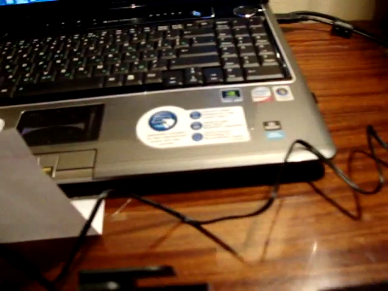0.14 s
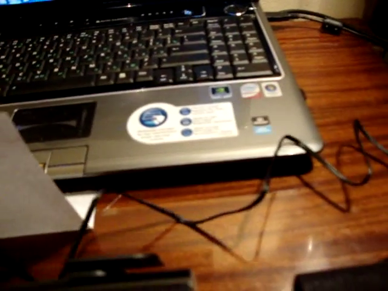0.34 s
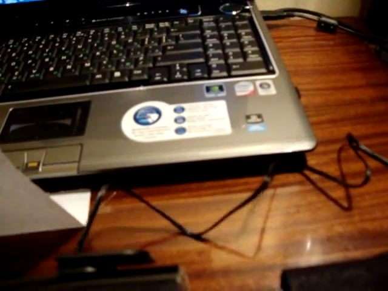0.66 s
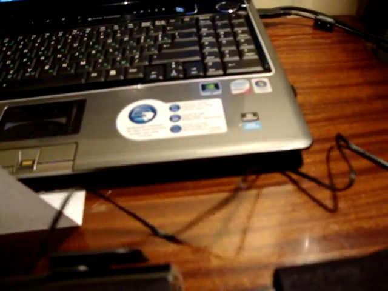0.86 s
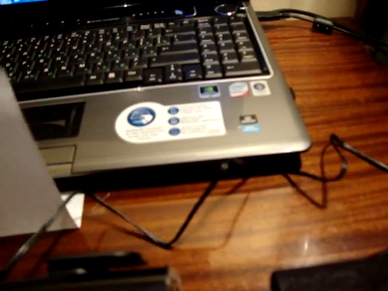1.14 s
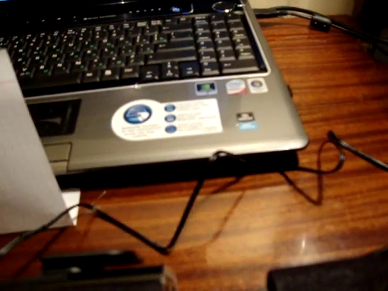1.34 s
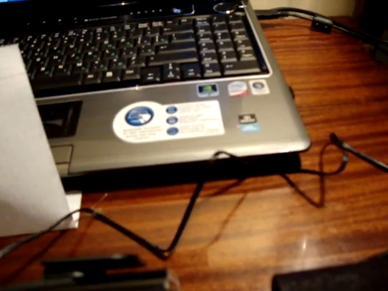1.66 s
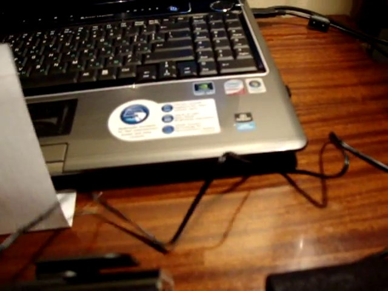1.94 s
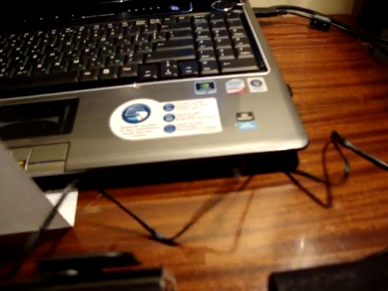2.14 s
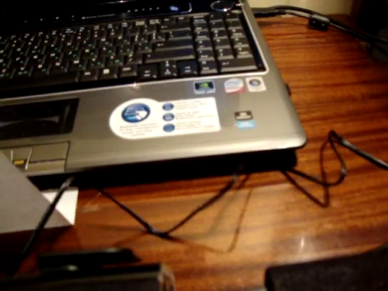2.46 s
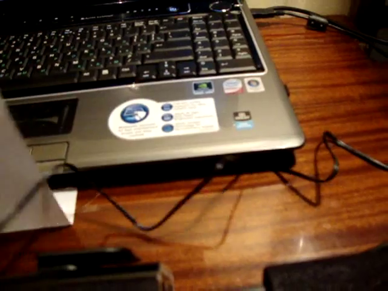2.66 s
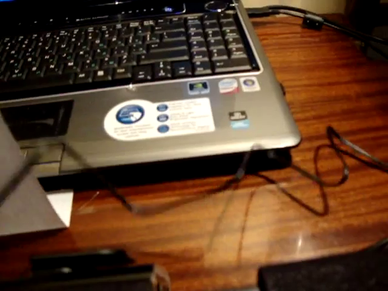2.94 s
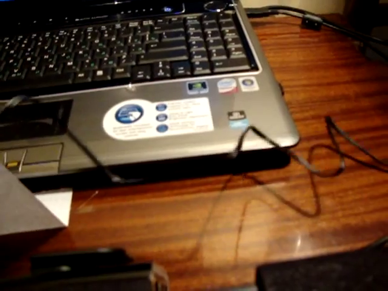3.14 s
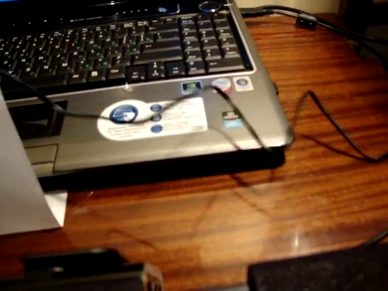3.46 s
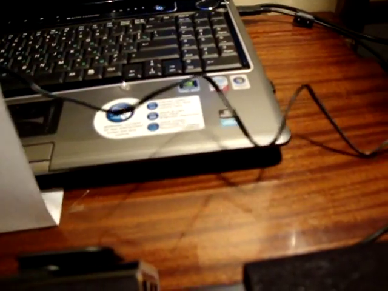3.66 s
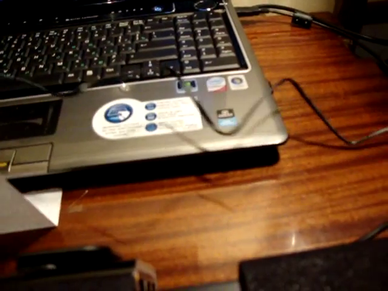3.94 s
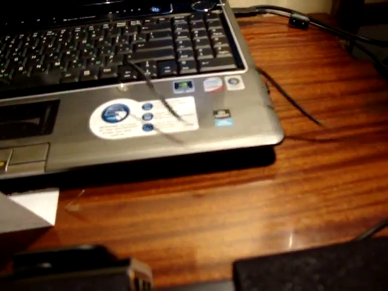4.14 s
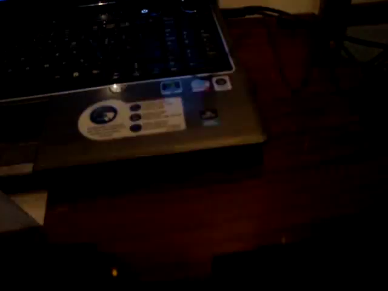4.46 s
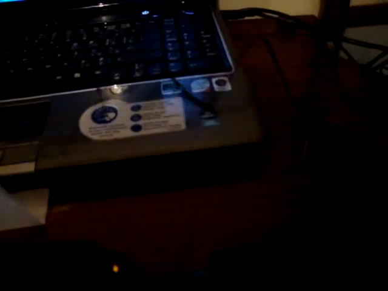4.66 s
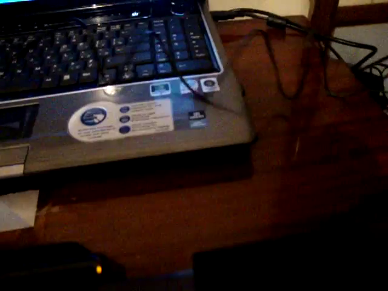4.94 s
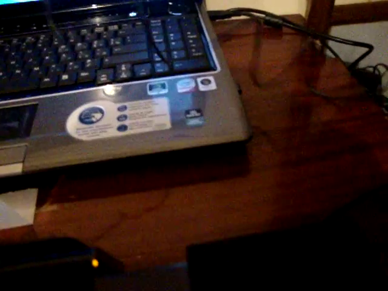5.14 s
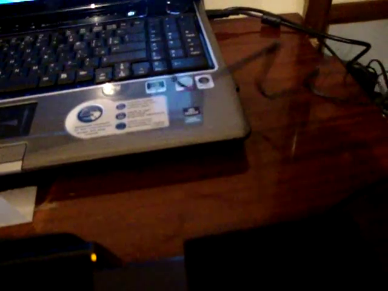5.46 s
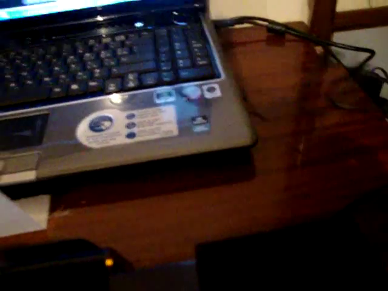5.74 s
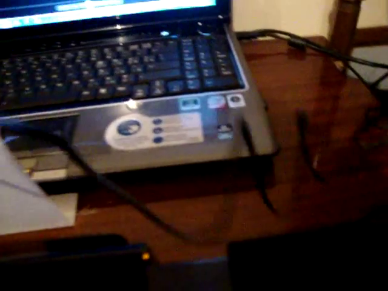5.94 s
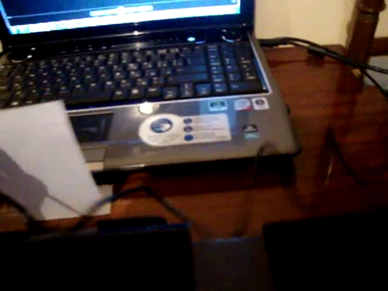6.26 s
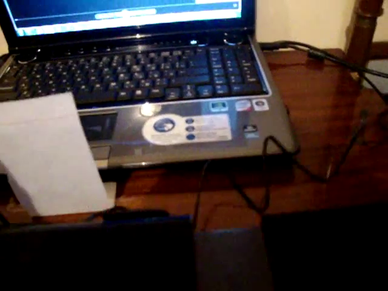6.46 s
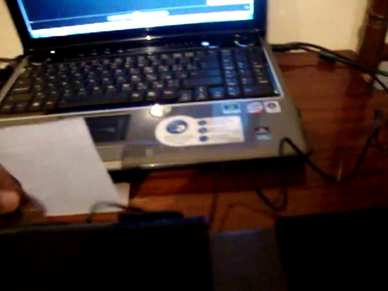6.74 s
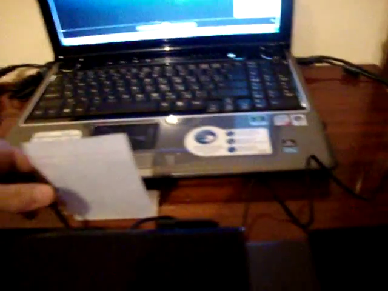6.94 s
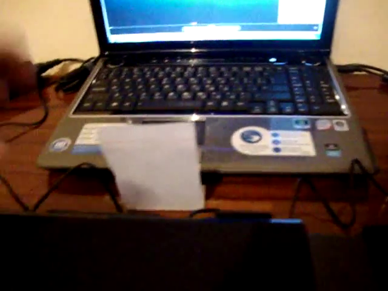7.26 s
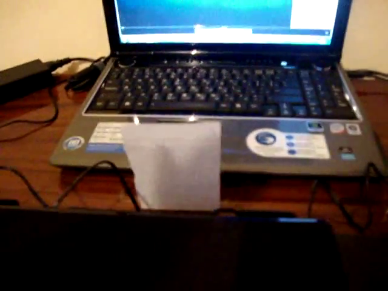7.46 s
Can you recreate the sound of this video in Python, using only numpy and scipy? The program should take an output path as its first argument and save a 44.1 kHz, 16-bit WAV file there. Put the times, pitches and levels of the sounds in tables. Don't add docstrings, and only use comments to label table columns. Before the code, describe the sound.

Dry woody knocks and plasticky clicks arrive unevenly, each with a tiny rattling chatter and brief scrape. The first half is mostly light handling; strong hits cluster just after four seconds, once past five, and thickly after six. It ends quietly with soft ticks and a very faint metallic ring. Nearby mono-like camera sound, short room reflections, soft fan-like hiss and gritty compression.

```python
import sys
import numpy as np
from scipy import signal
from scipy.fft import rfft, irfft
from scipy.io import wavfile
from scipy.ndimage import uniform_filter1d

SR = 44100
rng = np.random.default_rng(int(sys.argv[2]) if len(sys.argv) > 2 else 0)


def persist_wave(psi):
    counts = np.round(np.clip(psi, -1, 1) * 32767).astype(np.int16)
    wavfile.write(sys.argv[1], SR, np.atleast_2d(counts).T)


def linear_from_db(decibels):
    return 10 ** (np.asarray(decibels, float) / 20)


N = 335601

# f/Hz, level/dB
DESK_MODES = [(330, 1), (450, -8), (560, -45), (640, -15.5), (730, -10.5), (845, -16.5), (945, 3),
              (1075, 4.5), (1140, -1), (1285, 5), (1400, -2.5), (1530, 0), (1730, 2), (1920, 0.5)]
# f/Hz, level/dB
CASE_MODES = [(2150, -1), (2390, 4.5), (2620, 3), (2900, 3.5), (3250, -0.5), (3600, -4)]
# f/Hz, level/dB
EDGE_MODES = [(4150, -2), (4750, -2), (5350, -3), (6000, -5), (6700, -6), (7500, -9), (8500, -11),
              (9600, -20.5)]
MODE_T60 = (0.017, 0.0063, 0.0057)
# f/Hz, level/dB, t60/s
METAL_MODES = [(1911, -70, 1.6), (2552, -50.5, 1.4), (2988, -57, 1.3), (4199, -62, 1.5), (5346, -66, 1.2)]
METAL_START_S = 6.919
# f/Hz, density/dB per Hz
HISS_SPECTRUM = [(15, -49), (25, -11.5), (100, -4), (179, 1), (220, 2.5), (403, 4.5), (446, 1.5),
                 (758, 5.5), (1080, 6.5), (1230, 1.5), (2030, -1), (2190, -2), (5050, -4), (9490, -8),
                 (10500, -17.5), (13600, -20), (22000, -120)]
HISS_DB = -53
# f/Hz, rms level/dB
WHINE_TONE = (9647, -68.5)
# f/Hz, rms level/dB
CLOCK_TONE = (11025, -91.5)
# f/Hz, t60/s
ROOM_T60 = [(200, .17), (500, .24), (800, .21), (1600, .16), (3000, .14), (9000, .08)]
# start t/s, end t/s, kept depth under the loudest cell/dB
SILENT_SPANS = [(0.274, 0.333, 30), (0.338, 0.417, 37), (0.857, .885, 20), (0.918, 0.959, 27),
                (0.999, 1.03, 31), (1.21, 1.237, 34), (1.39, 1.429, 36), (1.499, 1.533, 25),
                (1.785, 1.823, 30), (1.895, 1.934, 27.5), (2.045, 2.069, 26), (2.07, 2.14, 44),
                (2.545, 2.567, 22.5), (3.262, 3.315, 29.5), (3.358, 3.405, 20.5), (4.173, 4.194, 19.5),
                (4.193, 4.241, 33), (4.214, 4.265, 52), (4.289, 4.375, 30.5), (4.526, 4.592, 39.5),
                (4.811, 4.847, 36.5), (5.169, 5.219, 29.5), (5.243, 5.277, 37), (5.452, 5.47, 16),
                (6.189, 6.294, 39), (6.291, 6.342, 36), (6.353, 6.433, 40), (6.538, 6.568, 30.5),
                (6.749, 6.793, 37)]
TOP_CUT_HZ = 10550
# t/s, level/dB, f/Hz
LOW_BUMPS = [
    (1.2, -59.5, 150),
    (1.75, -61, 140),
    (4.0, -65, 110),
    (4.25, -52.5, 114),
    (6.31, -50, 280),
    (5.29, -53, 420),
    (6.57, -55, 280),
]
# t/s, peak level/dB, strongest ring f/Hz, hardness (edge click over the peak)/dB
DESK_KNOCKS = [(0.476, -32.5, 1900, -25), (0.68, -18, 1370, -17), (0.924, -14, 1170, -9.5),
               (1.735, -22.5, 990, -21), (1.858, -29.5, 960, -19), (2.013, -33.5, 970, -29),
               (2.213, -41, 1020, -13), (2.649, -29, 1130, -14.5), (3.037, -34.5, 870, -27),
               (3.229, -40, 1000, -22), (3.475, -33, 1090, -12), (3.512, -39, 1150, -5),
               (4.223, -2.5, 1000, -14), (4.29, -15.5, 1220, -12), (4.555, -3.5, 1250, -20.5),
               (4.68, -22, 1080, -20), (5.254, 0, 860, -24), (6.116, -33.5, 530, -37),
               (6.18, -15, 656, -10.5), (6.239, -3.5, 1050, -19.5), (6.283, -9.5, 1270, -13),
               (6.462, -23, 790, -20), (6.754, -16.5, 820, -22.5), (6.78, -21, 960, -21)]
PLUG_DROPS = [(0.299, -14, 1280, -15), (0.343, -11.5, 970, -19.5), (0.485, -33.5, 1140, -17),
              (0.995, -22, 1310, -34), (1.055, -21, 1310, -24), (1.195, -22.5, 1330, -16),
              (1.406, -32.5, 1070, -15), (1.484, -34, 2290, -19), (1.561, -34, 2300, -14),
              (1.77, -31, 940, -18), (1.899, -12.5, 1100, -13.5), (2.121, -16, 960, -23),
              (2.262, -28.5, 770, -31), (2.708, -32, 1220, -25), (3.104, -33.5, 980, -27),
              (3.282, -37, 1760, -3), (4.201, -17, 1410, -10.5), (4.249, -11.5, 825, -11),
              (4.625, -23, 719, -32), (4.832, -12.5, 1100, -20), (6.292, -1.5, 1390, -13),
              (6.309, -4, 766, -26), (6.365, -7.5, 935, -13.5), (6.546, -21, 1350, -20.5),
              (6.918, -35.5, 775, -29)]
WIRE_FLICKS = [(0.387, -15.5, 1370, -17.5), (0.885, -27, 686, -19), (1.018, -12.5, 1270, -12.5),
               (1.182, -42, 1020, -2), (1.361, -35.5, 1770, -12), (1.423, -28, 980, -23),
               (1.507, -23.5, 1820, -15), (1.809, -18.5, 1040, -7), (2.592, -26, 660, -33),
               (3.318, -26.5, 970, -5), (3.332, -25, 2250, -12), (3.37, -26, 1630, -9),
               (3.486, -44, 1140, -2), (3.676, -39, 1830, -2), (4.263, -19.5, 2310, -3.5),
               (4.312, -17.5, 2160, -8.5), (4.431, -37, 2140, -15), (5.016, -37.5, 1330, -27),
               (5.099, -42, 789, -15), (5.47, -32.5, 2130, -14.5), (6.3, -6, 950, -11),
               (6.41, -2, 2520, -11), (6.561, -19, 1280, -32), (6.768, -20.5, 745, -16.5),
               (7.011, -39, 982, -24)]
CASE_TICKS = [
    (1.219, -31, 1000, -10.5),
    (1.95, -42.5, 1070, -13),
    (2.072, -30, 1880, -14),
    (2.551, -25.5, 810, -10),
    (4.156, -37, 1390, -9),
    (4.195, -22, 1320, -21),
    (4.343, -34, 1260, 6.5),
    (5.185, -32, 1860, -1),
    (6.251, -15, 960, -8.5),
    (6.421, -19, 960, -22),
]
# blows, case click over the peak/dB, chatter t60/s of a -13 dB blow
BLOW_KINDS = [(DESK_KNOCKS, -15, 0.064), (PLUG_DROPS, -8, 0.062),
              (WIRE_FLICKS, -4, 0.065), (CASE_TICKS, 3.3, 0.048)]
CHATTER_DB_PER_DB = 0.1772
HEAVY_DB_PER_OCTAVE = 0.25
CASE_LAG_DB_PER_DB = 0.0424
# start t/s, length/s, body level at the height/dB, paper hiss over the body/dB
WIRE_SLIDES = [(.42, 0.025, -34, -9), (.7, 0.041, -49.5, 10), (1.03, 0.077, -37, -5),
               (1.185, 0.092, -40.5, -6), (1.92, 0.049, -42.5, -7), (1.82, 0.045, -44, 4),
               (2.13, 0.11, -48, -10), (3.28, .14, -42.5, -2), (4.2, 0.17, -31.5, -20),
               (4.58, 0.1, -38, -6), (4.678, 0.053, -54, 11), (4.845, 0.073, -41.5, -7),
               (5.265, 0.096, -32.5, -18), (6.195, 0.049, -40.5, -30), (6.32, 0.025, -24, 9),
               (6.375, 0.017, -36, 3), (6.43, 0.12, -41.5, -1), (6.79, 0.1, -49, -9)]
PAPER_PULLS = [(.2, 0.053, -58.5, 5.5), (.59, 0.18, -52, -4), (1.07, 0.13, -45, -4.5),
               (1.33, 0.046, -52, -6), (1.64, .1, -50, 2.5), (2.055, 0.024, -36.5, -13),
               (2.61, 0.16, -48, -6.5), (3.49, .06, -60, 7), (3.58, .16, -57, 4), (4.06, 0.1077, -43, -1.5),
               (5.63, .11, -58.5, 7.5), (6.575, 0.11, -38.5, -8.5)]
# strokes, share of length before the height, start and end under the height/dB
STROKE_SHAPES = [(WIRE_SLIDES, 0.084, 1.5, 19.7), (PAPER_PULLS, 0.34, 6.7, 4.5)]
SCRAPE_DB, SCRAPE_FOLLOWS = -2.5, 0.55
THUMP_FROM_DB = -9
THUMP_DB, THUMP_S, THUMP_HZ = -39.5, 0.0027, 350


def band(x, low_hz, high_hz, order=2):
    return signal.sosfilt(signal.butter(order, [low_hz, high_hz], "band", fs=SR, output="sos"), x)


def rms_one(x):
    return x / np.sqrt(np.mean(x ** 2) + 1e-20)


def at_hz(points, hz):
    f, value = np.array(points)[:, :2].T
    return np.interp(np.log(hz), np.log(f), value)


def drift(rate):
    knots = rng.standard_normal(int(8 * 200) + 2)
    return np.interp(np.arange(N) / SR * min(rate, 200), np.arange(len(knots)), knots)


def hiss():
    hz = np.maximum(np.fft.rfftfreq(N, 1 / SR), 20)
    spectrum = rfft(rng.standard_normal(N)) * linear_from_db(at_hz(HISS_SPECTRUM, hz))
    air = rms_one(irfft(spectrum, N))
    whine_hz, whine_db = WHINE_TONE
    whine = np.sqrt(2) * np.sin(2 * np.pi * whine_hz * np.arange(N) / SR)
    return linear_from_db(HISS_DB) * air + whine * linear_from_db(whine_db + 2.2 * drift(32))


def ring(force, hz, t60):
    r, w = linear_from_db(-60 / (t60 * SR)), 2 * np.pi * hz / SR
    return signal.lfilter([0, np.sin(w)], [1, -2 * r * np.cos(w), r * r], force + 1e-18)


def drag():
    out, t = 0, np.arange(N) / SR
    bodies = zip((DESK_MODES, CASE_MODES, EDGE_MODES), MODE_T60, (9000, 12000, 14000))
    for k, (modes, t60, per_s) in enumerate(bodies):
        grains = (rng.random(N) < per_s / SR) * rng.standard_normal(N)
        grains *= linear_from_db(5.9 * np.minimum(rng.exponential(1, N), 4))
        grains *= linear_from_db(1.5 * drift(80))
        body = 0
        for j, (hz, db) in enumerate(modes):
            body = body + linear_from_db(db - 0.05 * hz / 1000) * ring(grains, hz, t60 * 0.97) * (-1) ** j
        stroke = np.zeros(N)
        for strokes, share, rise_db, fall_db in STROKE_SHAPES:
            for s, length, level_db, paper_db in strokes:
                level_db = level_db + (0, SCRAPE_DB + SCRAPE_FOLLOWS * paper_db, paper_db)[k]
                fade = np.clip(np.minimum(t - s + 0.0022, s + length + 0.024 - t) / 0.025, 0, 1)
                height_at = np.clip(share, .01, .99)
                shape_db = np.interp((t - s) / length, [0, height_at, 1], [-rise_db, 0, -fall_db])
                stroke = np.maximum(stroke, fade * linear_from_db(level_db + shape_db))
        out = out + rms_one(body) * stroke
    return out


def room(x):
    t, edges = np.arange(SR // 3) / SR, 150 * 2 ** np.arange(0, 6.5, .5)
    white = rng.standard_normal((2, len(t)))
    tail = np.zeros(len(t))
    for k, (low, high) in enumerate(zip(edges, edges[1:])):
        tail += band(white[k % 2], low, high) * linear_from_db(-60 * t / at_hz(ROOM_T60, low))
    tail *= np.clip(t / 0.015, 0, 1)
    return signal.fftconvolve(x, tail / np.sqrt(np.sum(tail ** 2)))[:N]


def struck(modes, force, t60, luck):
    hz, level_db = np.transpose(modes)[:, :, None]
    t = np.arange(1500) / SR
    strengths = linear_from_db(level_db + 2.2 * luck[:len(modes), None])
    response = np.sum(strengths * linear_from_db(-60 * t / t60) * np.sin(2 * np.pi * hz * t), axis=0)
    out = signal.fftconvolve(force, response)
    return out / np.max(np.abs(out))


def desk_at(hz, peak_db):
    modes = []
    for f, db in DESK_MODES:
        off_db = 14.0 * abs(np.log2(f / hz))
        heavy_db = HEAVY_DB_PER_OCTAVE * (peak_db + 18) * np.log2(f / 1000)
        modes.append((f, db - off_db - heavy_db))
    return modes + [(hz, 1.5)]


def taps():
    out, t = np.zeros(N + SR), np.arange(5000) / SR
    rise = np.clip(t / 0.00097, 0, 1)
    for blows, case_db, chatter_s in BLOW_KINDS:
        for (s, peak_db, hz, hard_db), luck in zip(blows, rng.standard_normal((30, 6, 5000))):
            chatter_t60 = chatter_s * linear_from_db(-CHATTER_DB_PER_DB * (peak_db + 13))
            case_level = case_db + 2 - CASE_LAG_DB_PER_DB * (peak_db + 20.5)
            levels_db = (-4.0, case_level, hard_db + 9.5)
            modes_struck = (desk_at(hz, peak_db), CASE_MODES, EDGE_MODES)
            at = round(s * SR) - 30
            bodies = zip(modes_struck, MODE_T60, levels_db, (.8, .6, .45))
            for k, (modes, ring_s, level_db, share) in enumerate(bodies):
                force = luck[k] * np.abs(luck[k]) * rise * linear_from_db(-60 * t / (chatter_t60 * share))
                force[25] += 6.5
                sound = linear_from_db(peak_db + level_db) * struck(modes, force, ring_s, luck[k + 3])
                out[at:at + len(sound)] += sound
    return out[:N]


def bumps():
    t, noise = np.arange(N) / SR, rng.standard_normal(N)
    out = np.zeros(N)
    for s, db, hz in LOW_BUMPS:
        out += linear_from_db(db) * np.exp(-((t - s) / 0.06) ** 2) * rms_one(band(noise, hz / 1.3, hz * 1.9))
    return out


def thumps():
    t, thump = np.arange(N) / SR, np.zeros(N)
    for s, peak_db, _, _ in DESK_KNOCKS + PLUG_DROPS + WIRE_FLICKS:
        if peak_db > THUMP_FROM_DB:
            thump += linear_from_db(peak_db + THUMP_DB) * np.exp(-((t - s - THUMP_S) / THUMP_S) ** 2)
    return thump * rms_one(band(rng.standard_normal(N), 22, THUMP_HZ, order=1))


def metal():
    t = np.maximum(np.arange(N) / SR - METAL_START_S, 0)
    out = np.zeros(N)
    for hz, db, t60 in METAL_MODES:
        pair = np.sin(2 * np.pi * hz * t) + 0.36 * np.sin(2 * np.pi * (hz - 23) * t)
        out += linear_from_db(db - 60 * t / t60 + 1.8 * drift(25)) * pair
    return np.clip(t / .07, 0, 1) * out


def scene():
    bass_cut = signal.butter(3, 430, "high", fs=SR, output="sos")
    near = signal.sosfilt(bass_cut, taps() + drag() + metal())
    return np.tile(near + linear_from_db(-14.0) * room(near) + hiss() + bumps() + thumps(), (2, 1))


def drop_weak_cells(x):
    hz, s, cells = signal.stft(x, SR, "hann", nperseg=384, noverlap=256)
    bands = np.arange(len(hz)) // 6
    count, frames = bands[-1] + 1, np.arange(len(s))
    power = np.array([np.mean(np.abs(cells[bands == b]) ** 2, axis=0) for b in range(count)])
    level = 10 * np.log10(power[bands] + 1e-16)
    grain = linear_from_db(level - 8.0) * np.exp(2j * np.pi * rng.random(level.shape)) * (hz[:, None] > 400)
    level += 2.5 * rng.standard_normal((count, len(s) // 3 + 1))[bands][:, frames // 3]
    level -= 1.13 * np.log2(1 + hz[:, None] / 1000)
    speck = rng.random((count, len(s) // 4 + 1))[bands][:, frames // 4] < .1
    cells *= 1 - .85 * speck * (hz[:, None] > 4800) * (hz[:, None] < 9400)
    for start, end, under_db in SILENT_SPANS:
        span = (s >= start) & (s < end)
        over_db = level[:, span] - level[:, span].max() + under_db
        keep = np.clip(over_db / 1.9 + .5, .01, 1)
        keep[hz < 500] = 1
        cells[:, span] = keep * (cells[:, span] + grain[:, span])
    return signal.istft(cells, SR, "hann", nperseg=384, noverlap=256)[1][:N]


def band_limit(x):
    return signal.sosfilt(signal.butter(12, 13220, fs=SR, output="sos"), x)


def record(dry):
    x = .75 * np.tanh(dry[0] / .75)
    top_cut = signal.cheby2(14, 45, TOP_CUT_HZ + 400, fs=SR, output="sos")
    x = drop_weak_cells(signal.sosfilt(top_cut, x))
    top = band(x, 9300, 10600, order=3)
    loud = uniform_filter1d(np.abs(x), size=700)
    side = linear_from_db(-8) * top * np.clip(loud / .012 - 1, 0, 1)
    clock_hz, clock_db = CLOCK_TONE
    clock = np.sqrt(2) * linear_from_db(clock_db) * np.sin(2 * np.pi * clock_hz * np.arange(N) / SR + .8)
    floor = clock + linear_from_db(-83.0) * rng.standard_normal(N)
    x = x + floor * np.clip(2 - uniform_filter1d(loud, size=3000) / 0.033, 0, 1)
    return band_limit(np.array([x + side, x - side]))


dry = scene()
out = record(dry)
persist_wave(out)
```